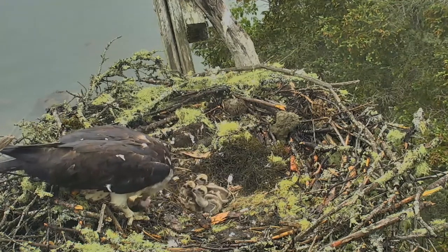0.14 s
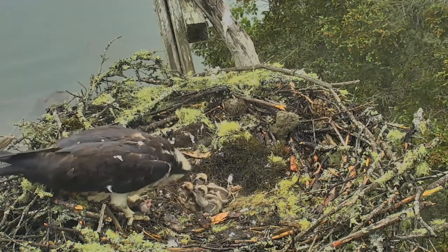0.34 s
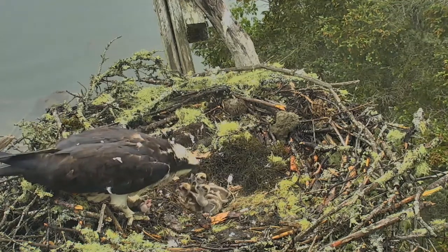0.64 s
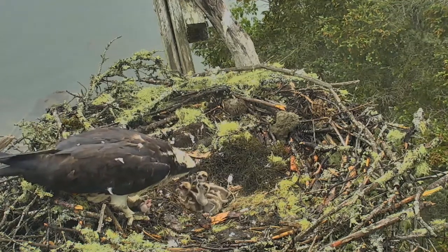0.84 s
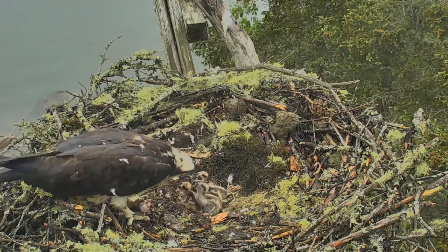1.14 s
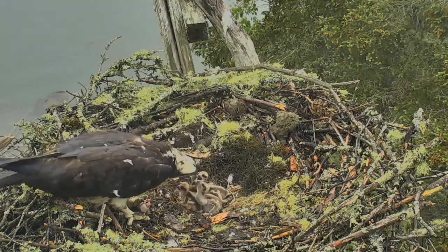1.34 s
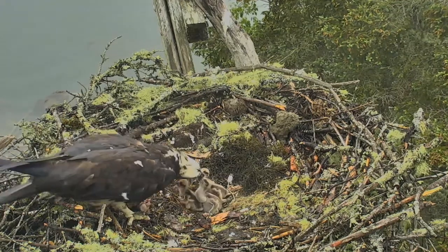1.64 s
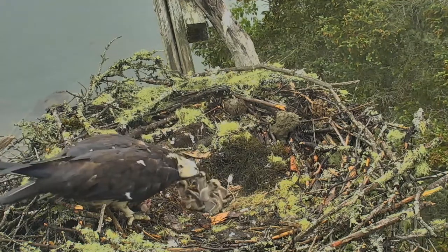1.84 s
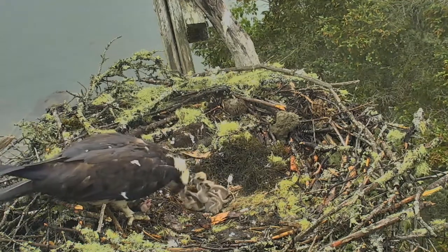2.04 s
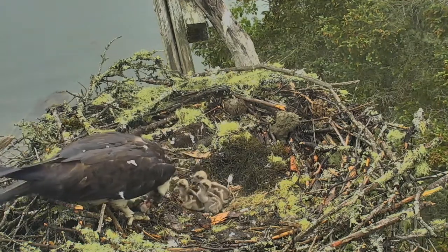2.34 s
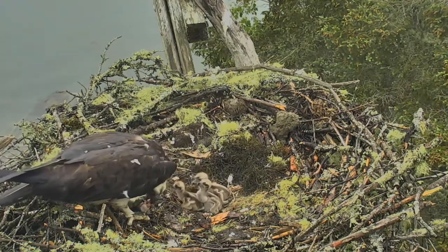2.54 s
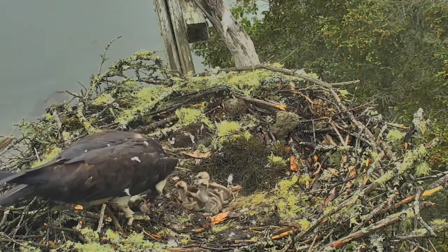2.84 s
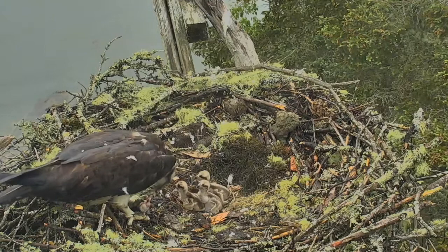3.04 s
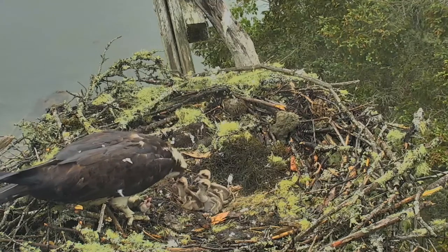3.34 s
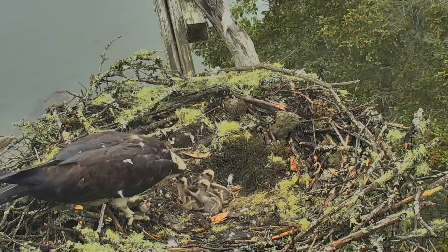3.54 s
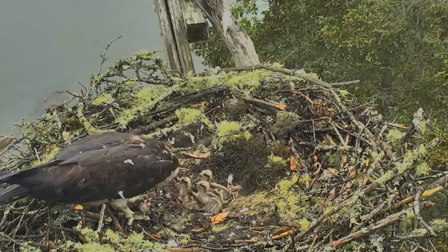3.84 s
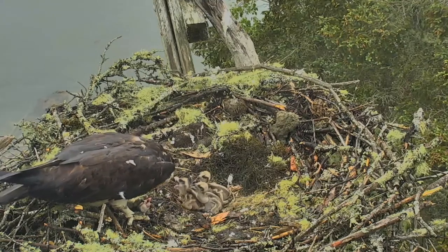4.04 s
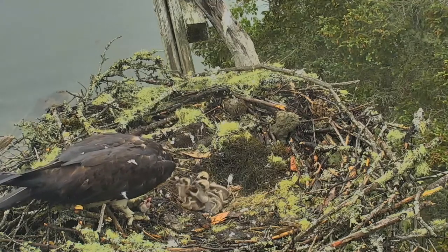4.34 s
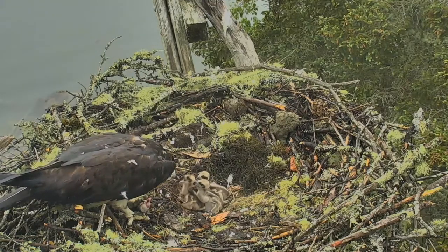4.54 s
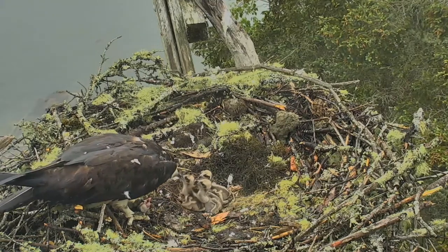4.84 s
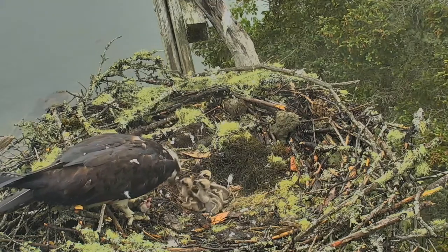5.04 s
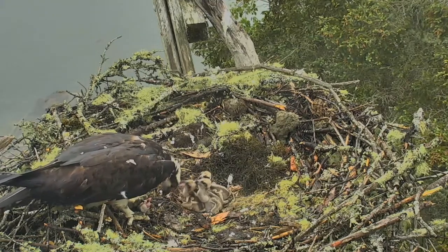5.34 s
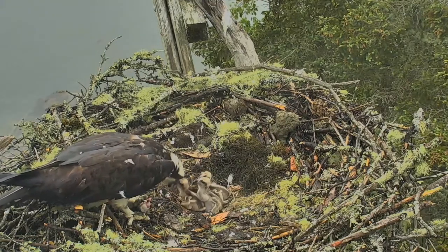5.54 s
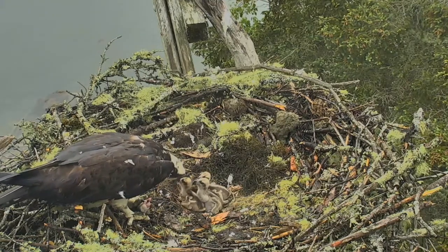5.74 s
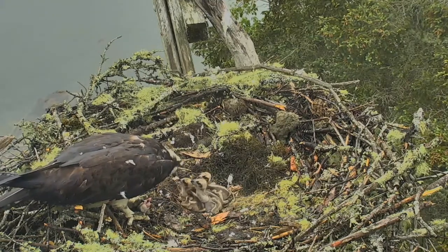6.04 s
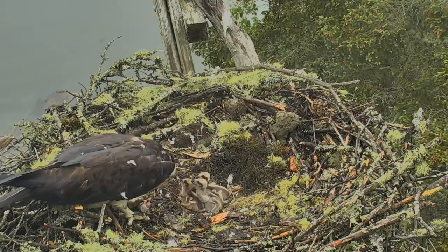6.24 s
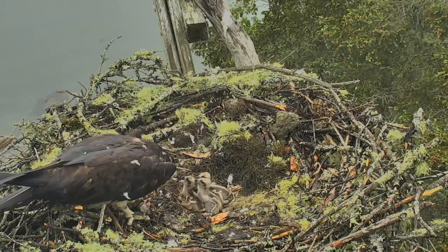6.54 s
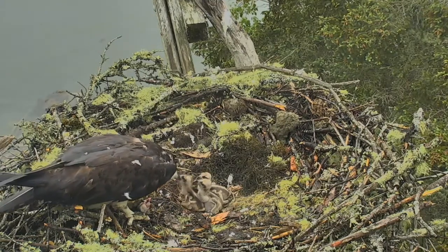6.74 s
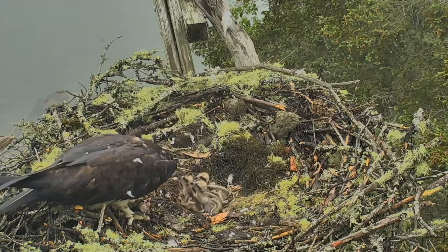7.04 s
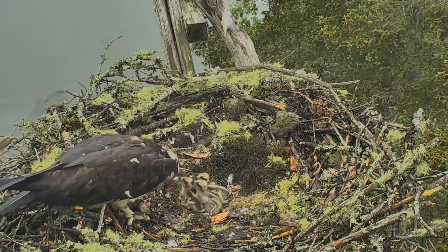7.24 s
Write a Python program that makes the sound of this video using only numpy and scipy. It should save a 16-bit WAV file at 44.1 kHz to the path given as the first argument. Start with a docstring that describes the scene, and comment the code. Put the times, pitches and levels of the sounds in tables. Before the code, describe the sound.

Young osprey chicks beg with short, wavering, two-toned whistles, strongest in the first two seconds, hoarser and weaker around the middle. The adult adds a tiny chirp among them and a much brighter, falling chirp near the end. Twigs click drily now and then, and low gusts bump the fixed outdoor microphone. Beneath everything lie a constant electrical-like low hum and muffled faraway roar.

```python
"""Osprey chicks beg with two-voiced whistles on a stick nest above water, heard by a fixed outdoor microphone.
Each whistle is a pair of sine voices with overtones, mixing tones and rasp; the adult adds two short chirps.
Twigs tick as snaps into resonances; below lie low buffets of wind, a mains hum of wavering lines
and a dull distant roar of coloured noise."""
import sys
import numpy as np
from scipy import signal
from scipy.fft import rfft, irfft
from scipy.io import wavfile
from scipy.ndimage import uniform_filter1d

SR = 44100
rng = np.random.default_rng(int(sys.argv[2]) if len(sys.argv) > 2 else 0)


def int16_out(signal):
    """Quantize to a 16-bit WAV file."""
    q = np.round(np.clip(np.atleast_2d(signal).T, -1, 1) * 32767)
    wavfile.write(sys.argv[1], SR, q.astype(np.int16))


N = 326340

# passage of overtones and the sum tone through the beak: pitch_hz, gain_db
BEAK = [(2000, -1), (3500, 2), (4400, -8), (5500, 3.5), (6500, 1), (7200, -2), (8000, -7.5), (9000, -11),
        (11000, -13), (12600, -19), (13800, -2), (15200, -16)]


def from_db(db):
    """Decibels to amplitude gain."""
    return 10 ** (np.asarray(db) / 20)


def rms_one(x):
    """Scale to unit rms."""
    return x / np.sqrt(np.mean(x ** 2) + 1e-20)


def in_time(rows):
    """Columns after the first (s) as linear curves, one value a sample."""
    s, *columns = np.transpose(rows)
    return [np.interp(np.arange(N) / SR, s, c) for c in columns]


def at_hz(points, hz):
    """Read a spectrum table on a log-frequency axis."""
    points = np.array(points)
    return np.interp(np.log(hz), np.log(points[:, 0]), points[:, 1])


def gate(spans, edge_s):
    """1 inside the spans, 0 outside, with linear edges."""
    t = np.arange(N) / SR
    on = sum((t >= a) & (t <= b) for a, b in spans) > 0
    return uniform_filter1d(on * 1.0, size=max(1, int(edge_s * SR)))


def resonance(x, hz, width_hz):
    """Two-pole resonance with gain 1 on top."""
    r = np.exp(-np.pi * width_hz / SR)
    b = np.array([1, 0, -1]) * (1 - r * r) / 2
    a = [1, -2 * r * np.cos(2 * np.pi * hz / SR), r * r]
    return signal.lfilter(b, a, x)


def low_noise(hz):
    """White noise under a fourth-order low-pass, unit rms; the first second settles the filter."""
    sos = signal.butter(4, hz, fs=SR, output="sos")
    return rms_one(signal.sosfilt(sos, rng.standard_normal(N + SR))[SR:])


def membrane(phrases):
    """Pitch, phase and amplitude of one vibrating membrane of the syrinx; phrase rows are (s, Hz, dB)."""
    rows = [row for phrase in phrases for row in phrase]
    hz, db = (uniform_filter1d(c, size=SR // 200) for c in in_time(rows))
    on = np.sqrt(2) * gate([(p[0][0], p[-1][0]) for p in phrases], edge_s=0.0041)
    return hz, 2 * np.pi * np.cumsum(hz) / SR, on * from_db(db)


def overtones(hz, phase, falls_db):
    """Harmonics from the second up, each weighed by the beak."""
    return sum(from_db(db + at_hz(BEAK, k * hz)) * np.sin(k * phase)
               for k, db in enumerate(falls_db, start=2))


def chick_voice(notes):
    """A membrane sings its notes: level slides, is weighed by the windpipe and wavers; pitch trembles."""
    # windpipe weight on a note by its pitch: pitch_hz, gain_db
    windpipe = [(900, 1.3), (1700, -0.8), (2400, 1.6), (2900, -1.1), (3300, -5), (3700, -2), (4300, -6.5)]
    unsteady_rms_db, wobble_rms_share = 2, .005
    phrases = []
    for start_db, end_db, _, _, p in notes:
        span_s = [p[0][0], p[-1][0]]
        phrases.append([(s, hz, np.interp(s, span_s, [start_db, end_db])) for s, hz in p])
    rasp, bright_db = in_time([(p[k][0], rough, db) for _, _, rough, db, p in notes for k in (0, -1)])
    hz, phase, size = membrane(phrases)
    rasp = np.clip(rasp, 0, 1)
    phase = phase + 2 * np.pi * np.cumsum(wobble_rms_share * hz * low_noise(hz=30)) / SR
    phase = phase + .6 * rasp * low_noise(hz=350)   # uneven cycles smear the lines
    size = size * from_db(at_hz(windpipe, hz) + unsteady_rms_db * low_noise(hz=29.8))
    return hz, phase, size, rasp, from_db(bright_db - 5.4 * rasp)   # rasp eats the overtones


def chicks():
    """Two membranes sound at once and mix in the windpipe into sum and side tones; rasp shakes them."""
    # notes of the upper voice, the lower voice and thin pure strands beside them; levels precede the
    # windpipe weight, overtones precede the loss to rasp:
    # start_level_db, end_level_db, rasp_0_to_1, overtones_db, pitch as (time_s, pitch_hz)
    upper_notes = [ (-52.5, -54, .1, -3.5, [(.483, 1910), (.497, 2740), (.513, 3420), (.525, 3770),
                   (.537, 3620)]), (-51.5, -43.5, .15, -3.5, [(.731, 1760), (.753, 2670), (.77, 3030),
                   (.785, 3160)]), (-60, -63, .28, 5, [(.786, 3350), (.819, 3490), (.829, 3370),
                   (.837, 3030)]), (-39.5, -48, .05, -0.5, [(.9715, 1820), (.979, 1850)]),
                   (-43.5, -56, 0.22, -16, [(.981, 2610), (.999, 3020), (1.017, 2940), (1.029, 2720)]),
                   (-52.5, -50.5, .1, -1.5, [(1.05, 1640), (1.072, 2740), (1.094, 3470)]),
                   (-58, -59, .3, -6, [(1.095, 3450), (1.12, 3640), (1.145, 4270), (1.16, 4290),
                   (1.186, 3640), (1.212, 3280)]), (-47.5, -44.5, 0.083, 2, [(1.255, 1506), (1.263, 1700),
                   (1.273, 1895)]), (-47.5, -47.5, 0.16, -10.5, [(1.274, 2860), (1.3, 2950), (1.335, 2950),
                   (1.352, 2840), (1.365, 2880)]), (-41, -44.5, 0.03, -12, [(1.366, 2880), (1.444, 2950),
                   (1.494, 2790)]), (-42, -48, 0.088, -11, [(1.495, 2790), (1.524, 3190), (1.536, 3100),
                   (1.56, 3340), (1.586, 2990), (1.598, 2546)]), (-54, -63, .15, -4, [(1.604, 3320),
                   (1.62, 3590), (1.65, 3070), (1.684, 2800)]), (-53, -63, 0.49, 1, [(3.333, 3080),
                   (3.359, 3730), (3.377, 3580), (3.391, 2690), (3.405, 1120)]),
                   (-64, -63, 0.58, 2.5, [(3.857, 2620), (3.885, 3630), (3.909, 3480), (3.921, 3550),
                   (3.949, 3100), (3.963, 3230)]), (-56, -66, .25, 2, [(3.967, 3690), (3.989, 3800),
                   (4.003, 3720), (4.029, 3090)]), (-63, -51, 0.18, 0, [(4.371, 2600), (4.433, 3480),
                   (4.455, 3290), (4.481, 3490)]), (-52, -60.5, 0.42, 0.5, [(4.482, 3490), (4.545, 3710),
                   (4.599, 3450), (4.615, 3130)]), (-52.5, -63, 0.18, -10, [(6.738, 1520), (6.77, 1770),
                   (6.79, 2240), (6.805, 2700)]), (-69, -60.5, 0.055, 6, [(6.806, 2720), (6.824, 3260),
                   (6.84, 3140), (6.858, 3480)]), (-62, -55.5, 0.083, -6, [(6.859, 3460), (6.882, 3490),
                   (6.91, 3840), (6.944, 3620), (6.98, 3640), (6.994, 2820), (7.008, 1500)]), ]
    lower_notes = [ (-56, -47.5, 0.29, -0.5, [(.808, 2800), (.84, 2800), (.856, 1025), (.864, 960)]),
                   (-49, -54, .05, -0.5, [(1.024, 2440), (1.048, 1557), (1.068, 1400)]),
                   (-53, -58, 0.35, -9, [(1.09, 2574), (1.118, 2690), (1.15, 3060), (1.184, 2830),
                   (1.212, 2820)]), (-50.5, -47.5, .22, -0.5, [(1.213, 2790), (1.228, 1116), (1.238, 971)]),
                   (-64, -42, 0.09, 0.5, [(1.472, 1580), (1.49, 2650), (1.504, 2814), (1.52, 2830)]),
                   (-53, -55, 0.2, 0, [(1.521, 2850), (1.56, 2643), (1.588, 2886), (1.62, 2927),
                   (1.66, 2730), (1.68, 2777), (1.7, 2390), (1.714, 1163), (1.728, 735)]),
                   (-50.5, -53.5, .08, -4, [(3.244, 1580), (3.264, 2280), (3.29, 2770), (3.314, 2500),
                   (3.332, 2810)]), (-54, -62, 0.45, 3, [(3.334, 2500), (3.362, 2970)]),
                   (-53, -56.5, 0.47, 0, [(3.733, 1440), (3.745, 1880), (3.765, 2490), (3.799, 2880)]),
                   (-55, -56, .1, -3, [(3.803, 2540), (3.835, 2310), (3.857, 2550)]),
                   (-60.5, -63, 0.48, 2, [(3.858, 2510), (3.925, 2410)]),
                   (-59.5, -56, .15, -1, [(3.932, 2600), (3.97, 2545), (4.0, 2650), (4.03, 2560),
                   (4.055, 1880)]), (-58, -51, .1, -2.5, [(4.275, 1470), (4.295, 2420), (4.305, 2680)]),
                   (-55, -59, 0.52, 3, [(4.308, 2250), (4.316, 3090), (4.33, 3240), (4.344, 2900),
                   (4.355, 2466)]), (-59, -63.5, 0.17, -2, [(4.356, 2456), (4.404, 2455), (4.432, 2560),
                   (4.44, 2324), (4.492, 2330)]), (-63, -56, 0.3, 0, [(4.497, 2020), (4.515, 2484)]),
                   (-65, -66, 0.71, 1, [(4.52, 2300), (4.58, 2225), (4.606, 2310)]),
                   (-49, -50.5, 0.2, 5, [(6.712, 904), (6.728, 1070)]), (-65, -68, .07, -2, [(6.8, 2150),
                   (6.854, 2234), (6.874, 2140), (6.984, 2380)]), ]
    strand_notes = [ (-56, -53, 0, 0, [(.762, 4330), (.814, 4740), (.842, 3760)]),
                    (-59, -68, 0, 0, [(1.08, 4020), (1.118, 4050), (1.134, 4230)]),
                    (-60, -63, 0, 0, [(1.6, 3900), (1.62, 4290), (1.64, 4000)]),
                    (-72, -59, 0.0044, 0, [(3.88, 2580), (3.9, 2800), (3.924, 2690)]), ]
    # harmonics from the second up, before overtone level and beak: level_db
    upper_falls_db = [-2.5, -7, -18.5, -22]
    lower_falls_db = [-4.5, -15, -26, -27]
    # throb of the upper voice on its long whistle: start_s, end_s, rate_hz, half_depth (doubled below)
    flutter = (1.274, 1.362, 280, 0.34)
    # throat bands of the rasp: centre_hz, width_hz (each of two passes), level_db
    throat = [(2570, 2200, -4.5), (5510, 880, -4.5), (10300, 2200, -23), (13700, 1500, -23)]
    sum_tone_db, side_tone_db = -9, -15
    throb_second_harmonic = 0.32   # against the first

    up_hz, up, up_size, up_rasp, up_bright = chick_voice(upper_notes)
    low_hz, low, low_size, low_rasp, low_bright = chick_voice(lower_notes)

    both = np.sqrt(up_size * low_size)
    sum_gain = np.sqrt(up_bright * low_bright) * from_db(sum_tone_db + at_hz(BEAK, up_hz + low_hz))
    mixed = sum_gain * np.sin(up + low) + from_db(side_tone_db) * np.sin(2 * up - low)

    start_s, end_s, rate_hz, half_depth = flutter
    beat = 2 * np.pi * rate_hz * np.arange(N) / SR + 0.35 * low_noise(hz=40)
    pulse = np.cos(beat) + throb_second_harmonic * np.cos(2 * beat)
    throb = 1 + 2 * half_depth * gate([(start_s, end_s)], edge_s=.006) * pulse

    shake = .5 * low_noise(hz=300)
    up_tone = np.sin(up) + up_bright * overtones(up_hz, up, upper_falls_db)
    low_tone = np.sin(low) + low_bright * overtones(low_hz, low, lower_falls_db)
    upper = throb * up_size * up_tone * (1 + up_rasp * shake)
    lower = low_size * low_tone * (1 + low_rasp * shake)

    _, strand, strand_size, _, _ = chick_voice(strand_notes)

    white = rng.standard_normal(N)   # air past the loose membranes
    hiss = sum(from_db(db) * rms_one(resonance(resonance(white, hz, width_hz), hz, width_hz))
               for hz, width_hz, db in throat)
    breath = (up_rasp * up_size + low_rasp * low_size) * hiss
    return upper + lower + both * mixed + strand_size * np.sin(strand) + breath


def chirp_shape(s, length_s, top_hz, end_hz, db):
    """Rows (s, Hz, dB) of one adult chirp: quick opening, hold, then pitch and level sag together."""
    attack_db, attack_power, scoop_hz = -5, 8.3, 60   # opens softer and flat
    droop_db, droop_power, sag_power = -21, 4.2, 3
    u = np.linspace(0, 1, 20)
    opening = (1 - u) ** attack_power
    hz = top_hz - scoop_hz * opening - (top_hz - end_hz) * u ** sag_power
    level_db = db + attack_db * opening + droop_db * u ** droop_power
    return list(zip(s + length_s * u, hz, level_db))


def adult():
    """Short clear chirps of few harmonics, with a breathy halo and a faint echo off the nest post."""
    # chirps: start_s, length_s, top_pitch_hz, end_pitch_hz, level_db
    chirps = [(3.75, 0.0221, 1969, 1883, -33.5), (6.666, 0.057, 2184, 1840, -23)]
    # second and third harmonic, before the beak: level_db
    falls_db = [-30, -33]
    hz, phase, size = membrane([chirp_shape(*row) for row in chirps])
    halo = low_noise(hz=1500) * (from_db(-31) * np.sin(phase) + from_db(-41) * np.sin(3 * phase))
    direct = size * (np.sin(phase) + overtones(hz, phase, falls_db) + halo)
    return direct + from_db(-33) * np.roll(direct, int(0.036 * SR))


def twigs():
    """Each tick is a snap and a few milliseconds of crackle into the twig resonances."""
    # ticks: start_s, drive_level_db, tilt_db_per_octave
    ticks = [(.0157, -53, -2.2), (0.0293, -34, -3), (0.0303, -43, 2), (0.0423, -53, 4), (.055, -54, 2),
             (.0595, -52, 2.2), (.063, -54, 2.2), (0.076, -46.5, 2), (.0786, -41.5, 2), (.1088, -60, 9),
             (0.1687, -44.5, -1.5), (0.1721, -45.5, 1), (2.074, -60, -5), (2.391, -58, -4),
             (2.6304, -56, -15.5), (2.681, -46, 0.5), (2.69, -58, -8.5), (2.893, -51, 3), (2.996, -61, 8),
             (3.031, -50, 3), (3.044, -47.5, 0), (4.666, -52.5, -8), (6.256, -51, -2), (6.677, -61, 13),
             (7.252, -56, -5)]
    # twig resonances: centre_hz, width_hz (each of two passes), drive_db
    modes = [(1890, 1270, 15), (2960, 430, -3), (5230, 2230, 15.5), (7640, 3000, -18), (11000, 2500, 2),
             (13300, 4300, -2)]
    tilt_about_hz, decay_s = 5000, .002
    t = np.arange(SR // 50) / SR
    bursts = .5 * rng.standard_normal((len(ticks), len(t))) * np.exp(-t / decay_s)
    bursts[:, 0] = 3.5   # the snap
    out = np.zeros(N)
    for hz, width_hz, db in modes:
        octaves = np.log2(hz / tilt_about_hz)
        drive = np.full(N + len(t), 1e-18)
        for (s, level_db, tilt_db), burst in zip(ticks, bursts):
            i = int(s * SR)
            drive[i:i + len(t)] += burst * from_db(level_db + db + tilt_db * octaves)
        out += resonance(resonance(drive[:N], hz, width_hz), hz, width_hz)
    return out


def wind():
    """Lumpy low pressure on the microphone membrane: gusts rise and fall over a faint steady breeze."""
    # gusts: peak_s, level_db
    gust_peaks = [(.13, -40), (.245, -31.5), (3.08, -36)]
    rise_db_per_s, fall_db_per_s, breeze_db = 250, 58, -62
    t = np.arange(N) / SR
    gusts = sum(from_db(db - np.maximum(rise_db_per_s * (s - t), fall_db_per_s * (t - s)))
                for s, db in gust_peaks)
    buffet = rms_one(resonance(low_noise(hz=59.7), 24, 21))
    buffet /= np.sqrt(uniform_filter1d(buffet ** 2, size=SR // 15) + 0.069)   # evens out its strength
    return (gusts + from_db(breeze_db)) * buffet


def hum():
    """Each line is a steady sine plus noise in a narrow resonance; lines from 45 to 140 Hz swell together."""
    # hum lines, levels before the swell: pitch_hz, steady_rms_db, wavering_rms_db, width_hz (each of two passes)
    lines = [(31.3, -53.5, -50, 3.3), (61, -55, -54, 6.3), (98.3, -98, -53.5, 37), (119.05, -47, -59, 17.4),
             (186.6, -62.5, -55.5, 26), (240, -66.5, -71, 3.5), (285, -77, -62, 14), (359, -55, -70, 2),
             (458.7, -65, -63.5, 17), (3102, -77.5, -87.5, 14.6)]
    # swell of the low lines: time_s, gain_db
    swell_points = [(0, 2.5), (2.2, -2.5), (4.5, -3), (7.4, 2.5)]
    out, swell = 0, from_db(in_time(swell_points)[0])
    for hz, steady_db, wavering_db, width_hz in lines:
        sine = np.sqrt(2) * np.sin(2 * np.pi * (hz * np.arange(N) / SR + rng.random()))
        noise = resonance(resonance(rng.standard_normal(N + SR), hz, width_hz), hz, width_hz)[SR:]
        line = from_db(steady_db) * sine + from_db(wavering_db) * rms_one(noise)
        out = out + line * (swell if 45 < hz < 140 else 1)
    return out


def roar():
    """Distant noise and microphone hiss as one shaped noise, coloured by the housing; its level wavers."""
    # relative spectrum: frequency_hz, density_db
    spectrum = [(15, -19), (45, -8), (80, -8), (150, -12.5), (200, -8), (360, -13.5), (500, -17),
                (720, -23.5), (950, -34), (2000, -33.5), (4000, -44), (8000, -49), (11500, -54.5),
                (16000, -56)]
    # colour of the housing, Gaussian bumps: centre_hz, width_hz (standard deviation), gain_db
    housing = [(1164, 233, 9), (1446, 33, -8.5), (2400, 130, -3), (4500, 220, -3.5), (5250, 160, 5.5),
               (6400, 290, 2.5), (7600, 340, -2)]
    mean_db, waver_rms_db = -46, 0.38
    hz = np.maximum(np.fft.rfftfreq(N, 1 / SR), 1)
    ripple_db = sum(db * np.exp(-.5 * ((hz - centre) / width) ** 2) for centre, width, db in housing)
    colour = from_db(at_hz(spectrum, hz) + ripple_db)
    level = from_db(mean_db + waver_rms_db * low_noise(hz=5.2))
    return level * rms_one(irfft(rfft(rng.standard_normal(N)) * colour, N))


def scene():
    """All sources at one microphone."""
    return (chicks() + adult() + twigs() + wind() + hum() + roar())[None]


def record(dry):
    """Two low-passes cut the top: steeply at first, fully a little higher."""
    steep = signal.ellip(10, .5, 18, 15800, fs=SR, output="sos")
    full = signal.cheby2(12, 40, 16600, fs=SR, output="sos")
    return signal.sosfilt(full, signal.sosfilt(steep, dry))


dry = scene()
out = record(dry)
int16_out(out)
```